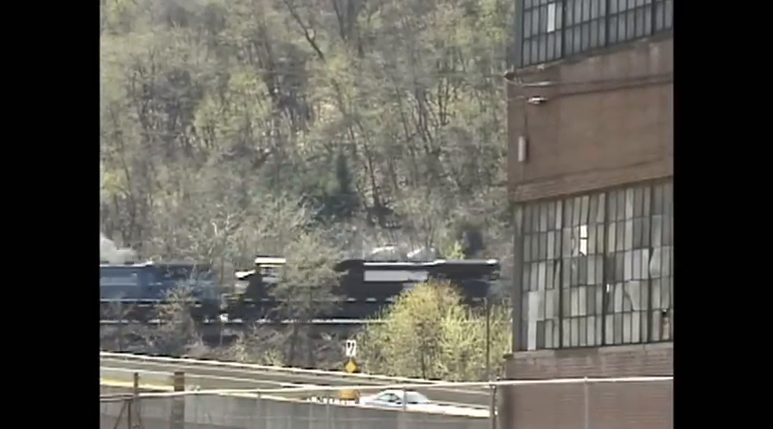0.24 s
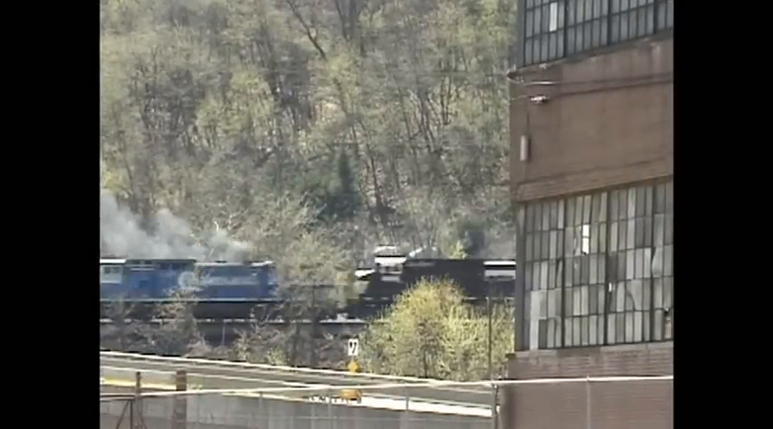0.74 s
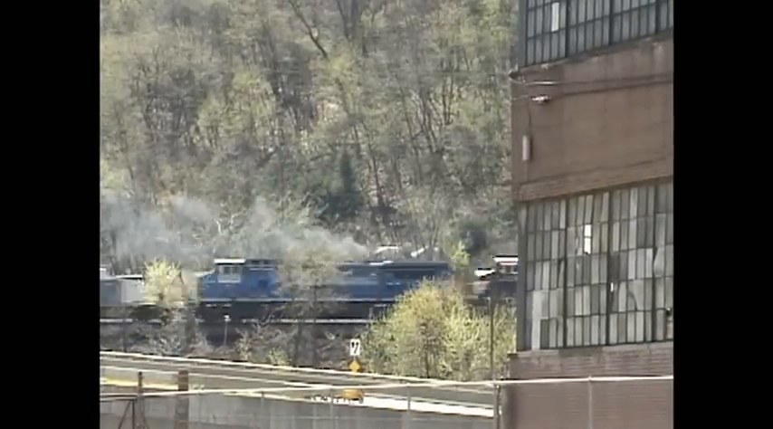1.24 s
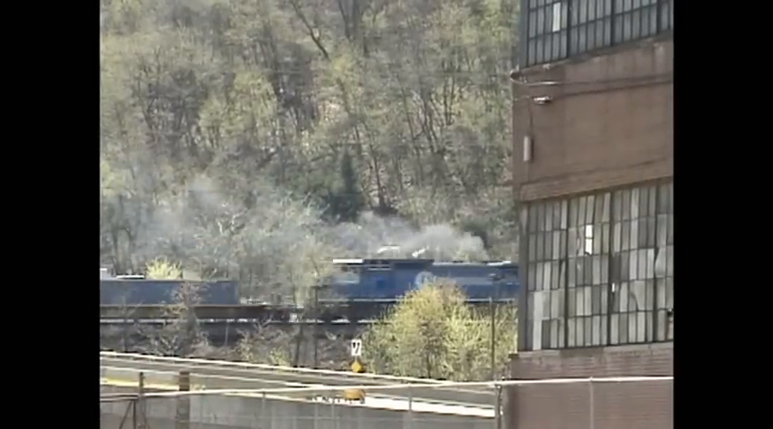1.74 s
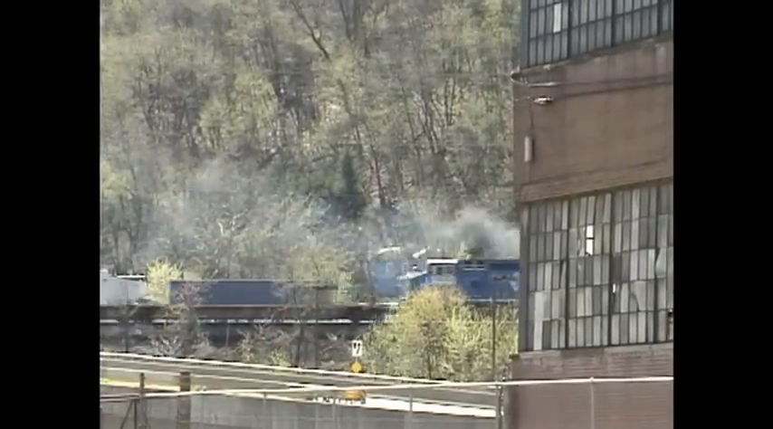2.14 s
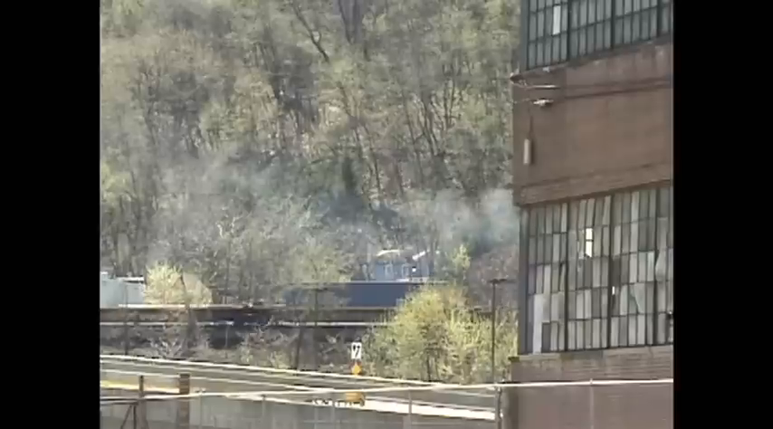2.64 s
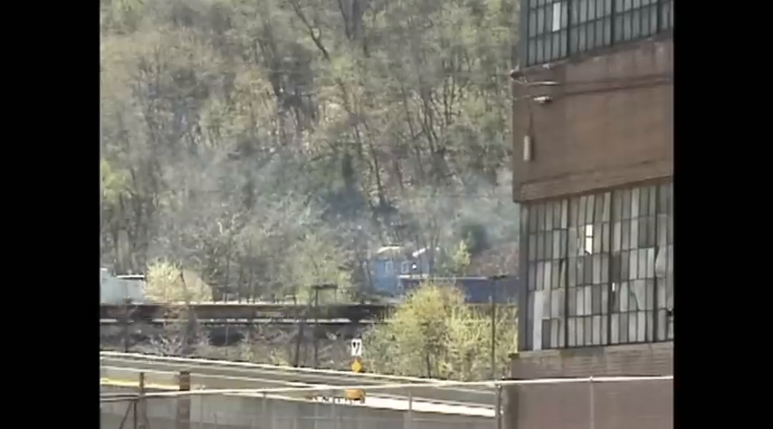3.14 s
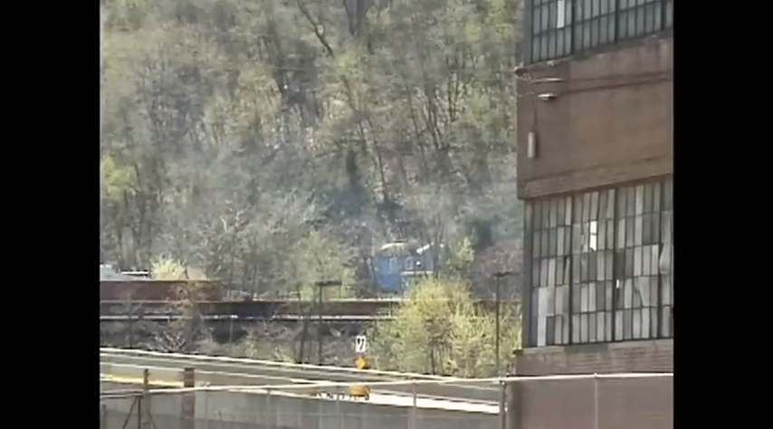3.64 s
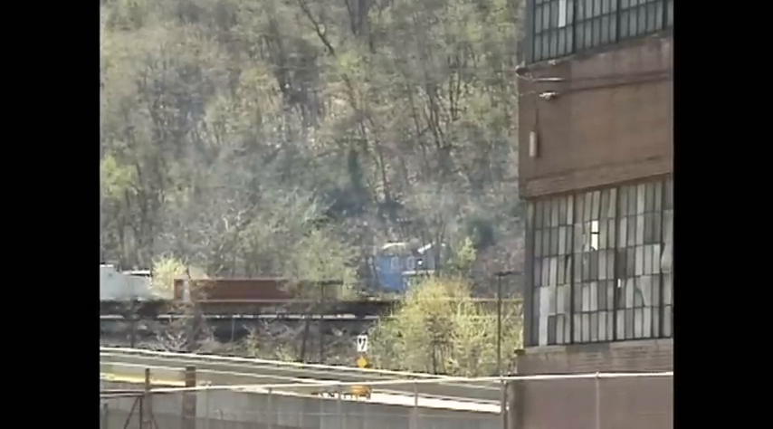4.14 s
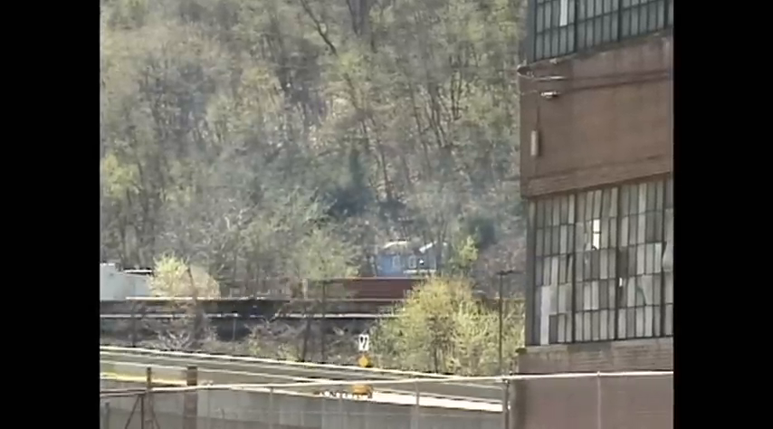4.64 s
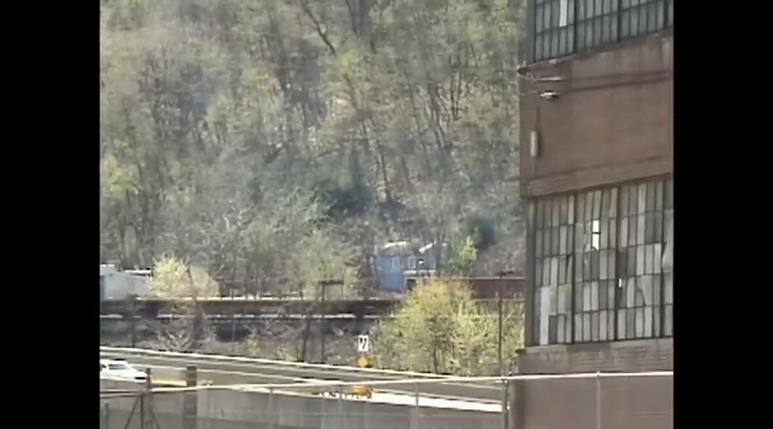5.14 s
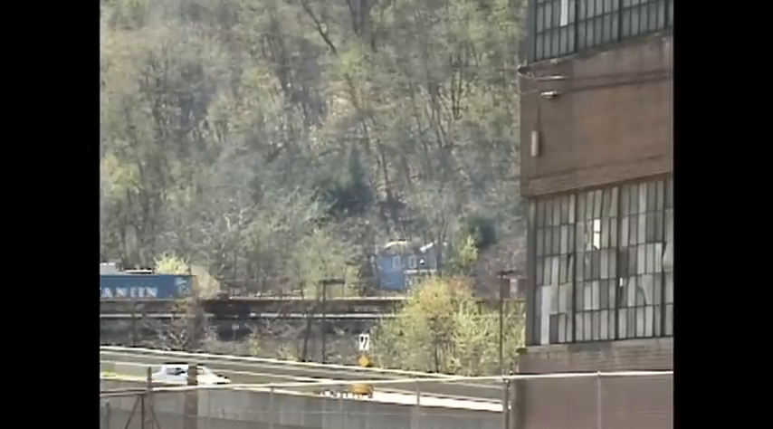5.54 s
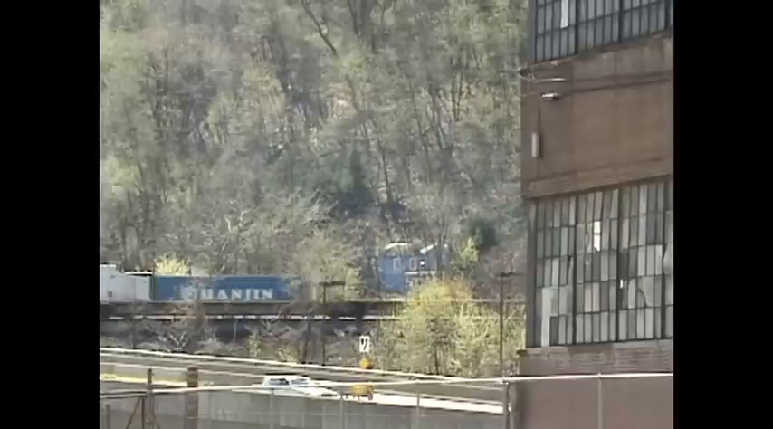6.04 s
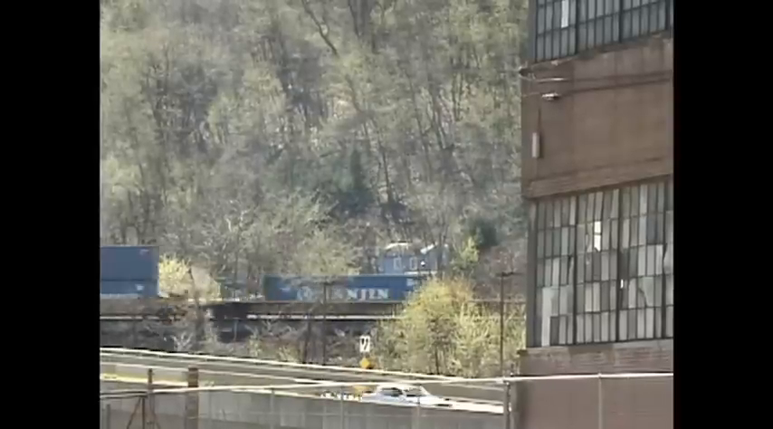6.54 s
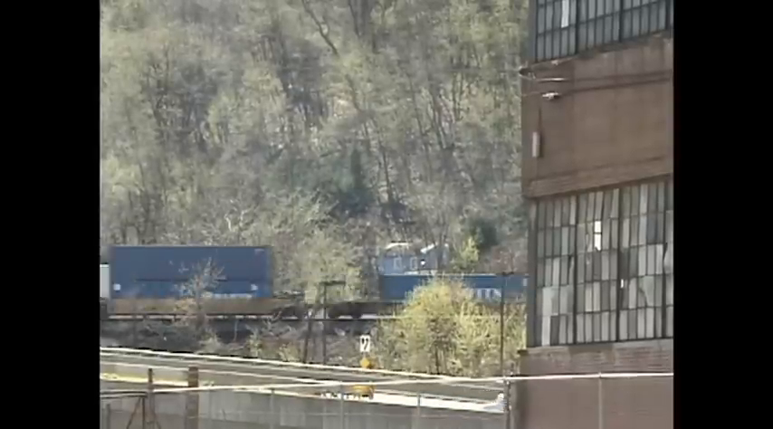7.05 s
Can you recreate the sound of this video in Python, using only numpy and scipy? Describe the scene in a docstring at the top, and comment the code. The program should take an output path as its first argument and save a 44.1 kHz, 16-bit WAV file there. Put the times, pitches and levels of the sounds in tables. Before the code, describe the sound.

A distant diesel freight train drones and rumbles past, wagons rattling and wheels squealing faintly, while sparrows chirp nearby.

```python
"""Two diesel engines drone and beat against each other as a freight train passes far off across a yard.
Each exhaust radiates harmonics of its firing cycle; a blower and a turbocharger whine above them.
Rolling wheels rumble and hiss, impacts rattle the wagons, and friction makes the flanges squeal.
Sparrows chirp nearby, echoed by a wall. A small camera hears it all through two close microphone
ports and adds its own faint whine and hiss."""
import sys
import numpy as np
from scipy import signal
from scipy.fft import rfft, irfft, next_fast_len
from scipy.io import wavfile
from scipy.ndimage import uniform_filter1d, map_coordinates

SR = 44100
rng = np.random.default_rng(int(sys.argv[2]) if len(sys.argv) > 2 else 0)


def generate_wav(signal):
    """Clip the signal to [-1, 1] and save it as 16-bit WAV at the path in sys.argv[1]."""
    frames = np.transpose(np.atleast_2d(signal))
    scaled = np.clip(frames, -1, 1) * 32767
    pcm = np.round(scaled).astype(np.int16)
    wavfile.write(sys.argv[1], SR, pcm)


N = 321489
TIME = np.arange(N) / SR
# the two microphone ports: f/Hz, left-right level/dB, left phase lead/rad, coherence
PORT_RESPONSE = [(12, -5.6, 0, .75), (35, -5.6, 1.4, .75), (65, -5.2, .85, .93), (110, -3.8, .7, .95),
                 (250, -.5, .6, .84), (420, -.7, .36, .92), (1000, -.3, .25, .89), (1600, 1, .32, .62),
                 (2500, 0, .3, .68), (4000, .1, .15, .45), (7000, .5, 0, .2)]


def diesels():
    """Beating: two engines gain speed at different rates, so their harmonics slide past each other."""
    # harmonics that each stack passes: order, starting level/dB, decay/(dB/s)
    second_orders = [(11, -34.5, .2), (12, -36, 1.3), (13, -28, 0), (15, -36.5, .9), (16, -36.5, 1.2),
                     (17, -32, 1.6), (19, -42, .3), (20, -44, .7)]
    leading_orders = [(11, -31.5, 0), (12, -38, 0), (13, -32, .2)]
    # transmission past trees, walls and a building: t/s, gain/dB
    second_path = [(0, 1), (1.9, .5), (2.7, -2), (4.3, -3), (4.75, 2), (5.6, -1), (6.1, -13), (7.29, -5)]
    leading_path = [(0, 1), (3.3, -4), (4.4, -12), (5.7, -13), (6.2, -4), (7.29, -3)]
    second = exhaust(ramp(6.722, .0805), second_orders, second_path)
    return second + exhaust(ramp(6.915, .148), leading_orders, leading_path)


def exhaust(cycle_hz, orders, path):
    """Periodic firing gives a harmonic series locked to the crank; the stack passes only a few orders."""
    crank = 2 * np.pi * (np.cumsum(cycle_hz) / SR + rng.random()) + .015 * wobble(3)
    drone = 0
    for order, db, decay in orders:
        level = amp(ramp(db, -decay) + 1.6 * wobble(4))
        lag_rad = np.pi / 8 * (order - 13) ** 2
        drone += level * np.sin(order * crank - lag_rad + .12 * wobble(3))
    return np.sqrt(2) * amp(*curves(path)) * drone


def whines():
    """Rotor tones follow shaft speed: the blower sinks, the turbocharger climbs, and both recede."""
    # blower, its half-speed tone and turbocharger: t/s, level/dB
    blower_levels = [(0, -56), (.4, -51), (1.3, -52), (1.6, -47), (2.1, -49), (2.3, -45), (2.65, -45),
                     (2.87, -50), (2.92, -43), (3.35, -43), (3.39, -56), (3.44, -43), (3.78, -44),
                     (3.92, -55), (4.1, -45.5), (4.35, -53), (5.3, -66)]
    half_levels = [(0, -56), (.8, -54), (1.4, -51), (2.3, -55), (3, -62), (7.29, -75)]
    turbo_levels = [(0, -52), (.65, -51), (1.05, -58), (1.5, -52), (1.8, -49), (2.05, -55), (3.9, -63),
                    (5.5, -80)]
    blower_hz, turbo_hz = ramp(990, -6), ramp(1467, 31.5)
    blower = amp(*curves(blower_levels)) * tone(blower_hz, drift_rad=.65, flutter_db=4, rate=36)
    blower += amp(*curves(half_levels)) * tone(blower_hz / 2, drift_rad=1.9, flutter_db=4, rate=25)
    return blower + amp(*curves(turbo_levels)) * tone(turbo_hz, drift_rad=.95, flutter_db=3.5, rate=28)


def housings():
    """Forced vibration: engine noise drives narrow resonances of the sheet steel."""
    # modes: f/Hz, bandwidth/Hz, level/dB
    modes = [(2135, 150, 1), (2540, 270, -2.5), (3260, 180, -4.5)]
    response = lambda f: sum(amp(db) * resonance(f, hz, width) for hz, width, db in modes)
    level = amp(ramp(-52, -.9) + 1.7 * wobble(2))
    return level * unit(filtered(spread(rng.standard_normal((2, N))), response))


def rolling():
    """Broadband noise: track rumble, engine roar and wheel hiss are incoherent, so their powers add."""
    # t/s, roar level/dB, rumble level/dB, hiss level/dB
    levels = [(0, -39.5, -35, -43), (1.5, -39.5, -35, -38.5), (3.3, -42.5, -35.5, -40.5),
              (3.9, -44, -35, -41), (4.4, -41.5, -33.5, -43), (6.2, -42, -34, -44),
              (7.1, -40.5, -33.5, -42.5)]
    # spectra: f/Hz, relative spectral density/dB
    rumble_spectrum = [(15, -19), (30, -5.5), (50, 6), (70, 5), (95, 1), (130, 2.5), (150, 0), (190, -4),
                       (260, -10.5), (480, -9.5), (560, -17.5), (700, -64.5)]
    roar_spectrum = [(400, -49), (560, -4), (680, 6), (900, 3), (1170, 4), (1330, -3.5), (1480, -3),
                     (1650, -5.5), (2000, -11), (3000, -91.5)]
    hiss_spectrum = [(900, -2.5), (1250, -3), (1510, -9), (1680, -7.5), (1950, -3), (2300, -4.5),
                     (2810, -5.5), (3050, -10), (3400, -8), (4200, -15), (5370, -24), (6200, -33),
                     (7000, -38), (11800, -120)]
    roar_db, rumble_db, hiss_db = curves(levels)
    rumble = amp(rumble_db + 1.3 * wobble(1.154)) * rush(rumble_spectrum, patchy_db=.26)
    roar = amp(roar_db + .084 * wobble(3.7)) * rush(roar_spectrum, patchy_db=1.4)
    hiss = amp(hiss_db + .26 * wobble(8)) * rush(hiss_spectrum, patchy_db=1.4)
    return rumble + roar + hiss


def rattle(clinks_per_s=1300):
    """Impact excitation: loose steel on the wagons gives swarms of damped clinks that merge into rasps."""
    # t/s, duration/s, level/dB, centre f/Hz
    rasps = [(0.602, 0.36, -59, 2860), (0.795, 0.12, -48, 3320), (1.025, 0.084, -48, 3930),
             (1.034, 0.088, -47, 2540), (1.189, 0.039, -48, 2950), (1.598, 0.2, -52.5, 3500),
             (1.6, 0.22, -49, 2454), (1.715, 0.05, -45.5, 2430), (1.718, 0.045, -55, 4370),
             (.83, .14, -47.5, 2137), (2.089, 0.24, -43.5, 2465), (2.099, 0.2, -50.5, 3290),
             (2.221, 0.12, -46, 3710), (2.454, 0.049, -56.5, 3400), (2.738, 0.1, -57.5, 3310),
             (2.901, 0.11, -45.5, 3610), (3.062, 0.14, -50, 4010), (3.228, 0.046, -46, 3430),
             (3.337, 0.14, -54, 3390), (3.624, 0.095, -49, 2890), (3.632, 0.069, -53, 4320),
             (3.775, 0.15, -48, 2680)]
    pair, t = np.zeros((2, N)), np.arange(900) / SR
    for start, length, db, centre_hz in rasps:
        draws = rng.random((2, 900, 3, 1))[:, :round(clinks_per_s * length)]
        pitch, when, strength = np.moveaxis(draws, 2, 0)
        hz = centre_hz * ((pitch + .01) / (1.01 - pitch)) ** .065
        clinks = amp(14 * strength) * np.sin(np.pi * when) ** .6 * np.sin(2 * np.pi * hz * t)
        clinks *= np.exp(-t * hz / 12) * (1 - np.exp(-t / .0008))  # time constant of twelve cycles
        samples = ((start + length * when) * SR).astype(int) + np.arange(len(t))
        swarm = np.array([np.bincount(at.ravel(), c.ravel(), N)[:N] for at, c in zip(samples, clinks)])
        pair += amp(db) * unit(swarm) * np.sqrt(length * SR / N)
    return spread(pair)


def panel(start=2.12, length=.16, hz=2110, db=-49):
    """Resonance: one mode of a wagon panel swells and fades in a short, fuzzy ring."""
    swell = np.sin(np.pi * progress(TIME, start, length)) ** .5
    return amp(db) * swell * tone(np.full(N, hz), drift_rad=.6, flutter_db=2, rate=30)


def squeaks():
    """Frequency modulation: couplings and springs squeak in glides roughened by a hard pitch tremor."""
    # t/s, duration/s, start f/Hz, middle f/Hz, end f/Hz, level/dB
    glides = [(.895, .03, 1900, 2150, 2500, -48), (1.034, .034, 2150, 2400, 2080, -46),
              (1.072, .04, 2100, 2600, 2480, -45), (1.725, .025, 2600, 2500, 2300, -46),
              (2.103, .052, 1950, 2550, 2800, -46), (2.222, .034, 2550, 2740, 2650, -44),
              (2.25, .022, 4200, 4350, 4300, -53), (2.92, .03, 2750, 2700, 2650, -49),
              (3.22, .03, 2700, 2750, 2800, -50), (3.665, .025, 2900, 2850, 2800, -48)]
    out = np.zeros((2, N))
    for start, length, *hz, db in glides:
        place(out, start, whistle(length, hz, tremor_hz=1200, burr=.6), db)
    return out


def squeal(attack_s=.023, release_s=.065, fade_db=9, boost_db=3.5):
    """Friction excitation: rubbing flanges drive the wheel's modes, over a thin broad scrape."""
    # t/s, duration/s, starting level/dB, f/Hz of the boosted, singing mode
    rubs = [(5.36, .32, -73, 6750), (5.775, .3, -58.5, 4490), (6.102, .5, -63, 4970),
            (6.12, .85, -72, 6590)]
    # f/Hz, bandwidth/Hz, level/dB
    wheel_modes = [(4490, 70, -2), (4970, 90, -2), (5850, 130, -11), (6590, 60, -11), (6750, 60, -14),
                   (7500, 400, -30)]
    friction, out = spread(rng.standard_normal((2, N))), 0
    for start, length, db, singing_hz in rubs:
        def wheel(f):
            high_pass = 1 / (1 + (.85 * singing_hz / (f + 1)) ** 12)
            scrape = .2 * np.exp(-((f - 5500) / 1500) ** 2)
            ring = sum(amp(level + boost_db * (hz == singing_hz)) * resonance(f, hz, width)
                       for hz, width, level in wheel_modes)
            return high_pass * (scrape + ring)
        gate = progress(TIME, start, attack_s) * np.clip((start + length - TIME) / release_s, 0, 1)
        level = amp(db - fade_db * progress(TIME, start, length))
        out += gate * level * unit(filtered(friction, wheel))
    return out


def sparrows(echo_db=-8.5, reverb_s=.22):
    """Direct and reflected sound: one bird repeats a call, other birds chirp, and a wall echoes."""
    # notes of the call: t/s, duration/s, start, middle and end f/Hz, part (0 first, 1 second, 2 flicks)
    call_notes = [(0, .013, 5000, 5450, 5950, 2), (.019, .043, 3950, 3950, 3300, 0),
                  (.06, .009, 5200, 4750, 5400, 2), (.075, .018, 3200, 3550, 3950, 1),
                  (.091, .023, 3950, 3430, 3380, 1), (.102, .004, 4600, 5200, 6000, 2)]
    # t/s, level/dB of each of the three parts, pitch factor
    calls = [(.122, -53, -46, -68, 1.0), (1.922, -52, -55, -65, 1.01), (2.796, -52, -52, -69, 1.03),
             (3.692, -52, -55, -60, 1.0), (6.313, -46, -43.5, -58, 1.0), (7.152, -49, -46, -70, 1.01)]
    # one more of its calls and other birds' chirps, note by note:
    # t/s, duration/s, start, middle and end f/Hz, level/dB, left-right level/dB
    chirp_notes = [(3.082, .036, 3600, 3520, 3400, -48, 0), (3.163, .024, 3600, 3460, 3350, -46, 0),
                   (3.243, .014, 4200, 4100, 3900, -49, 0), (4.596, .028, 3950, 4080, 3880, -47, 0),
                   (4.667, .018, 3980, 3800, 3400, -50, 0), (5.638, .035, 3850, 3450, 3100, -51, 0),
                   (5.673, .045, 3150, 3680, 3000, -52, 0), (4.578, .012, 5000, 5400, 5800, -65, 0),
                   (4.638, .009, 5200, 4700, 5300, -55, 0), (6.917, .024, 4300, 4600, 4400, -53, 6),
                   (6.938, .028, 4400, 3700, 3100, -55, 6), (6.977, .027, 2950, 3250, 2950, -46, 6)]
    direct = np.zeros((2, N))
    for start, *parts_db, pitch in calls:
        for delay, length, *hz, part in call_notes:
            place(direct, start + delay, whistle(length, pitch * np.array(hz)), parts_db[part])
    for start, length, *hz, db, pan_db in chirp_notes:
        place(direct, start, whistle(length, hz), db, pan_db)
    t = np.arange(SR // 4) / SR
    tail = rng.standard_normal((2, len(t))) * amp(-60 * t / reverb_s)
    echo = signal.fftconvolve(direct, tail / np.linalg.norm(tail[0]), axes=1)[:, :N]
    return direct + amp(echo_db) * echo


def whistle(length, hz, tremor_hz=400, burr=.42):
    """A modulated oscillator glides through three pitches; a resonance near 8 kHz lifts its weak octave."""
    u = np.linspace(0, 1, round(length * SR))
    glide_hz = np.polyval(np.polyfit([0, .5, 1], hz, 2), u)
    tremor = uniform_filter1d(tremor_hz * rng.standard_normal(len(u)), size=40)  # smoothing shrinks it
    phase = 2 * np.pi * np.cumsum(glide_hz + tremor) / SR
    octave = amp(-30) * np.exp(-((2 * glide_hz - 8100) / 450) ** 2)
    note = np.abs(np.sin(np.pi * u)) ** .45 * (np.sin(phase) + octave * np.sin(2 * phase))
    note *= 1 + burr * np.sin(phase / 24 + 2 * np.pi * rng.random())  # sidebands roughen the note
    return unit(note)


def swells(width_hz=900):
    """Swept band-pass noise: faint treble hiss swells, slides upward and fades."""
    # t/s, duration/s, start f/Hz, end f/Hz, level/dB
    sweeps = [(.5, .55, 8300, 12000, -86), (2.68, .3, 8200, 8850, -79), (2.9, .72, 8900, 9600, -81),
              (5.7, .38, 7600, 8600, -78), (6.45, .7, 8600, 8900, -85)]
    hz, t, spectra = signal.stft(rng.standard_normal((2, N)), SR, nperseg=512)
    gain = 0
    for start, length, start_hz, end_hz, db in sweeps:
        u = progress(t, start, length)
        centre_hz = start_hz + (end_hz - start_hz) * u
        band = np.exp(-((hz[:, None] - centre_hz) / width_hz) ** 2)
        gain += amp(db) * np.sin(np.pi * u) ** .5 * band / np.sqrt(np.mean(band ** 2, axis=0))
    return signal.istft(spectra * gain, SR, nperseg=512)[1][:, :N]


def camera():
    """Self-noise: amplifier hiss and thin motor tones set the noise floor; two tiny ticks sound close by."""
    # f/Hz, relative spectral density/dB
    hiss_spectrum = [(4500, -49), (6500, -17), (8000, -13), (10000, -19), (13000, -27.5), (15400, -39.5)]
    # f/Hz, level/dB
    motor_tones = [(6595, -90), (6697, -93), (6788, -92), (6891, -93), (7192, -96), (7494, -97),
                   (8489, -100), (8689, -101), (8990, -100), (9292, -100), (9588, -101), (10191, -101)]
    # t/s, level/dB, f/Hz, left-right level/dB
    ticks = [(3.904, -47, 9400, -25), (4.193, -47, 7500, -13)]
    hiss_level = amp(-78.5 + .7 * wobble(4) + 1.1 * wobble(6.4))
    out = hiss_level * unit(filtered(rng.standard_normal((2, N)), lambda f: amp(along(hiss_spectrum, f))))
    out += sum(amp(db) * tone(np.full(N, hz), drift_rad=.7, flutter_db=3, rate=14) for hz, db in motor_tones)
    t = np.arange(200) / SR
    envelope = amp(-60 * t / .0028) * (1 - np.exp(-t / .00019))
    for start, db, hz, pan_db in ticks:
        place(out, start, envelope * np.sin(2 * np.pi * hz * t), db, pan_db)
    return out


def tone(hz, drift_rad, flutter_db, rate):
    """Random modulation: a sine of rms near 1 wavers in phase and level, as it does through moving air."""
    phase = 2 * np.pi * (np.cumsum(hz) / SR + rng.random()) + drift_rad * wobble(rate)
    return np.sqrt(2) * amp(flutter_db * wobble(rate)) * np.sin(phase)


def rush(spectrum, patchy_db):
    """Spectral shaping: stereo noise of rms 1 with patches of random gain in time and frequency."""
    spectra = signal.stft(rng.standard_normal((2, N)), nperseg=512)[2]
    patches = uniform_filter1d(rng.standard_normal(spectra.shape[1:]), size=5, axis=0)
    patches = uniform_filter1d(patches, size=12, axis=1)
    pair = signal.istft(spectra * amp(patchy_db * unit(patches)), nperseg=512)[1][:, :N]
    return unit(spread(filtered(pair, lambda f: amp(along(spectrum, f)))))


def spread(pair):
    """Partial coherence: two independent signals mix to the likeness that the ports hear."""
    angle = lambda f: np.arccos(np.clip(along(PORT_RESPONSE, f, column=3), 0, 1)) / 2
    mid, side = filtered(pair, lambda f: np.array([np.cos(angle(f)), np.sin(angle(f))]))
    return np.array([mid + side, mid - side])


def place(out, start, sound, db, pan_db=0):
    """Superposition: add a sound at start seconds, with a left-right level difference."""
    span = out[:, round(start * SR):][:, :len(sound)]
    span += (amp(db + np.array([[pan_db / 2], [-pan_db / 2]])) * sound)[:, :span.shape[1]]


def resonance(f, hz, width):
    """Response of two equal damped resonators in cascade."""
    return (1j * f * width / (hz * hz - f * f + 1j * f * width)) ** 2


def filtered(x, response):
    """Linear filtering by a complex frequency response; mirrored ends prevent clicks."""
    edge = SR // 4
    size = next_fast_len(N + 2 * edge)
    padded = np.pad(x, [(0, 0)] * (x.ndim - 1) + [(edge, edge)], "reflect")
    return irfft(rfft(padded, size) * response(np.fft.rfftfreq(size, 1 / SR)), size)[..., edge:edge + N]


def wobble(rate):
    """A smooth random curve, rate knots a second."""
    coarse, knots = TIME[::32], rng.standard_normal(int(N * rate / SR) + 4)
    return np.interp(TIME, coarse, map_coordinates(knots, [coarse * rate]))


def along(points, hz, column=1):
    """One table column interpolated on a logarithmic frequency axis."""
    table = np.transpose(points)
    return np.interp(np.log(hz + 1), np.log(table[0] + 1), table[column])


def curves(rows):
    """One value per sample for each column after the time."""
    times, *columns = np.transpose(rows)
    return [np.interp(TIME, times, column) for column in columns]


def ramp(start, per_s):
    """Linear change with time."""
    return start + per_s * TIME


def progress(t, start, length):
    """Elapsed fraction of an event, 0 to 1."""
    return np.clip((t - start) / length, 0, 1)


def amp(db):
    """Amplitude ratio of a level in dB."""
    return 10 ** (np.asarray(db) / 20)


def unit(x):
    """x at rms 1."""
    return x / np.sqrt(np.mean(x ** 2) + 1e-20)


def scene():
    """Superposition: the outdoor sources add and reach the two ports with level and phase differences."""
    engines = diesels() + whines() + housings()
    outside = engines + rolling() + rattle() + panel() + squeaks() + squeal() + swells() + sparrows()
    half = np.array([[.5], [-.5]])
    gain = lambda f: amp(half * along(PORT_RESPONSE, f))
    lead_rad = lambda f: half * along(PORT_RESPONSE, f, column=2)
    return filtered(outside, lambda f: gain(f) * np.exp(1j * lead_rad(f))) + camera()


def record(dry, cutoff_hz=15480):
    """Band limiting: the camera passes nothing above its cutoff."""
    return filtered(dry, lambda f: f < cutoff_hz)


dry = scene()
out = record(dry)
generate_wav(out)
```